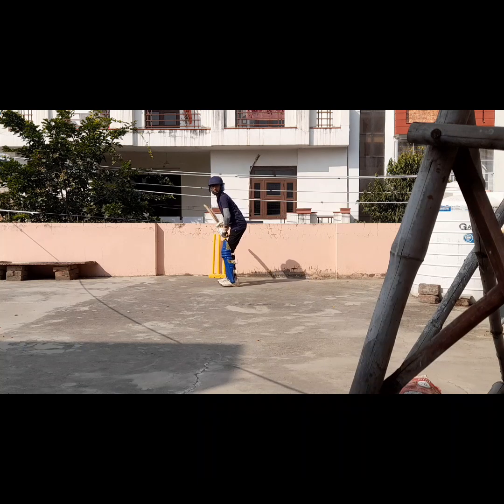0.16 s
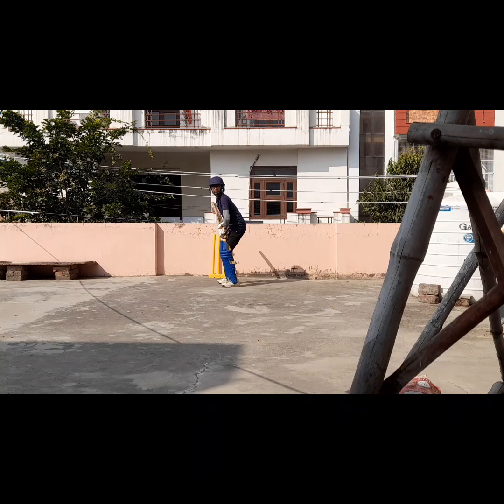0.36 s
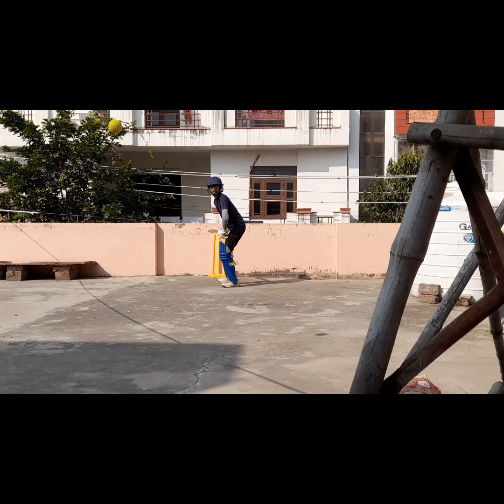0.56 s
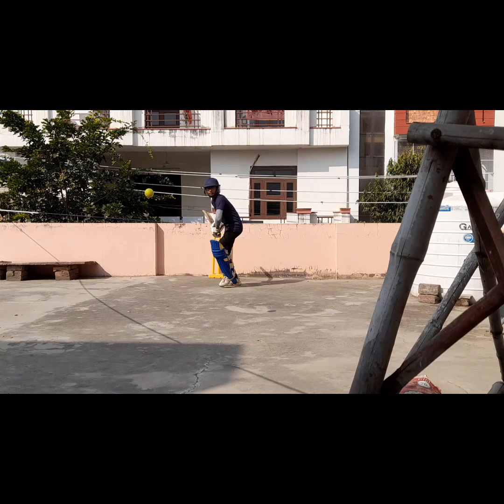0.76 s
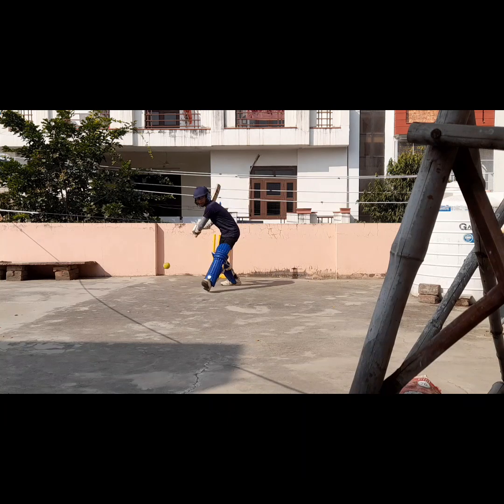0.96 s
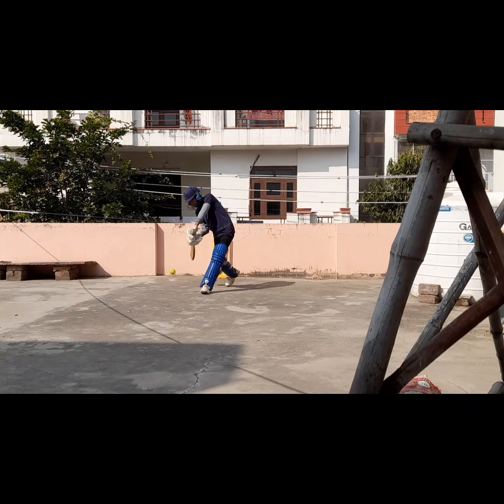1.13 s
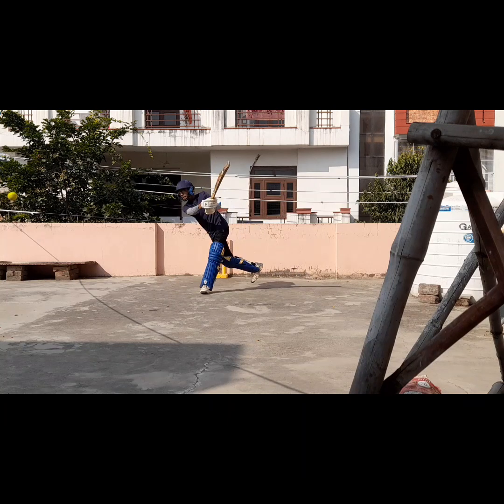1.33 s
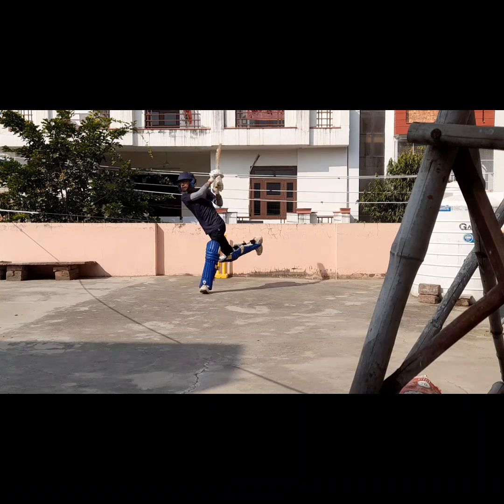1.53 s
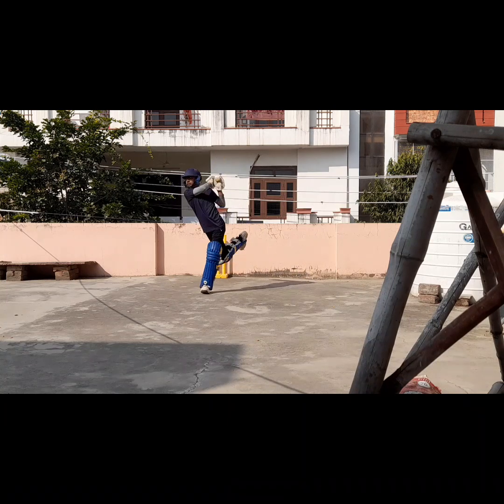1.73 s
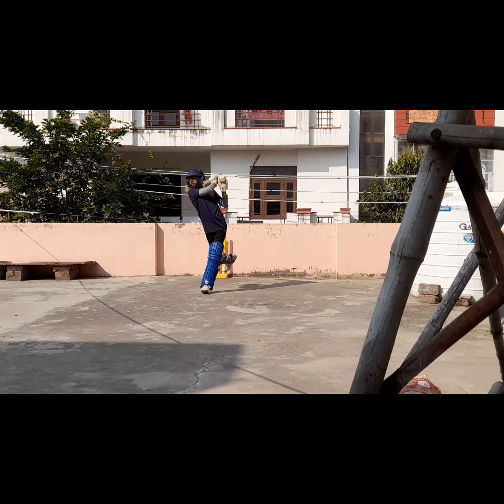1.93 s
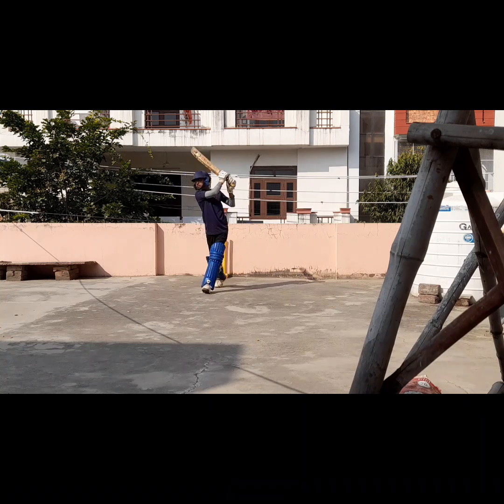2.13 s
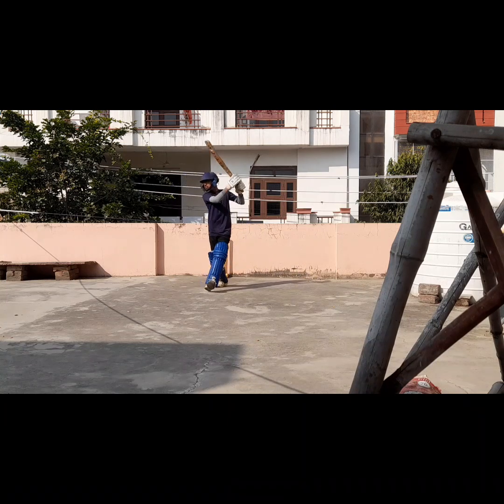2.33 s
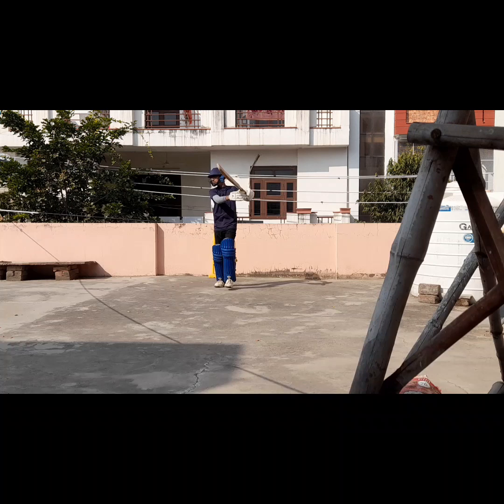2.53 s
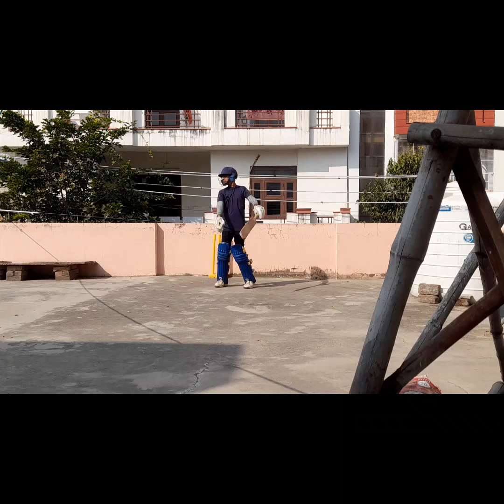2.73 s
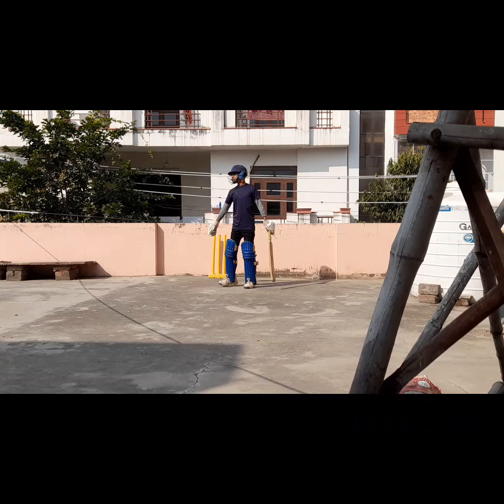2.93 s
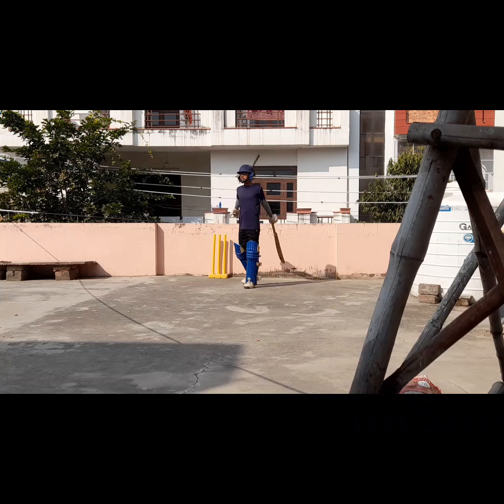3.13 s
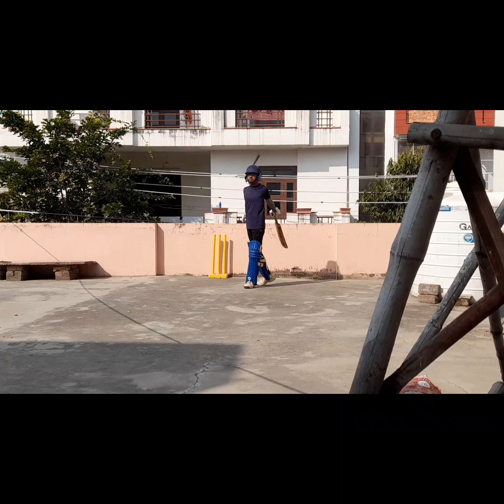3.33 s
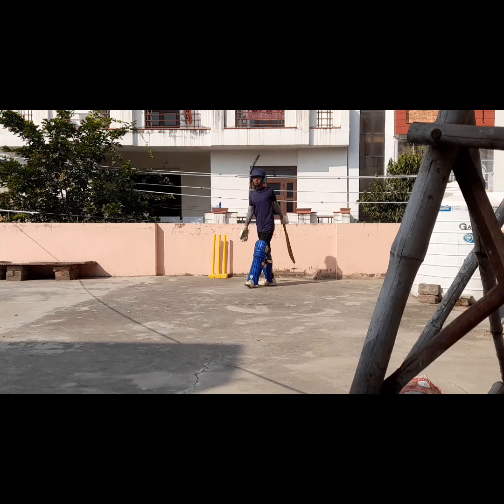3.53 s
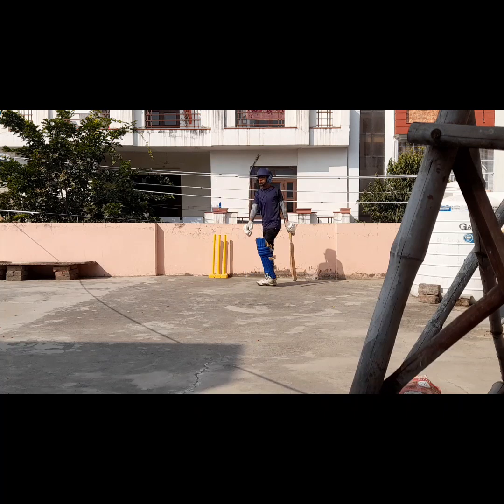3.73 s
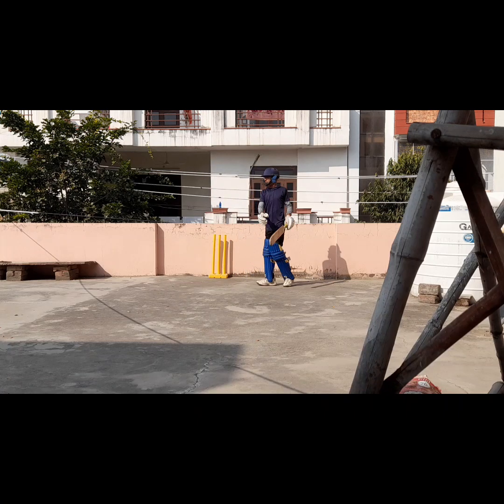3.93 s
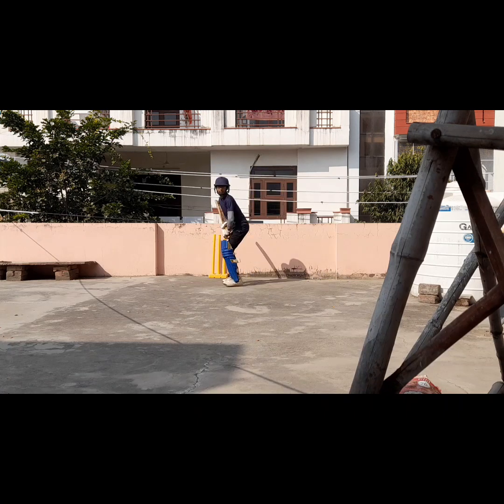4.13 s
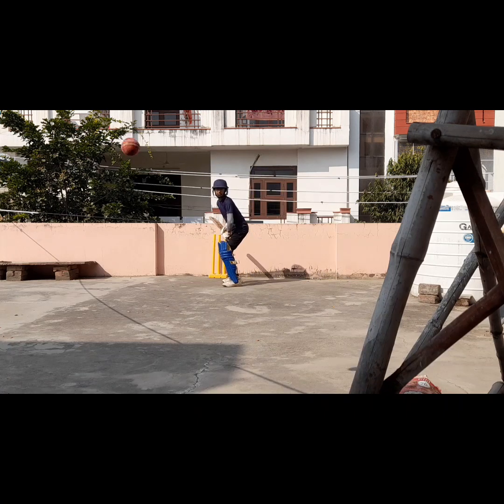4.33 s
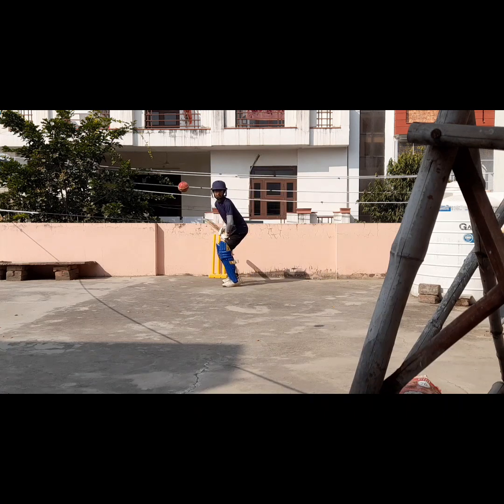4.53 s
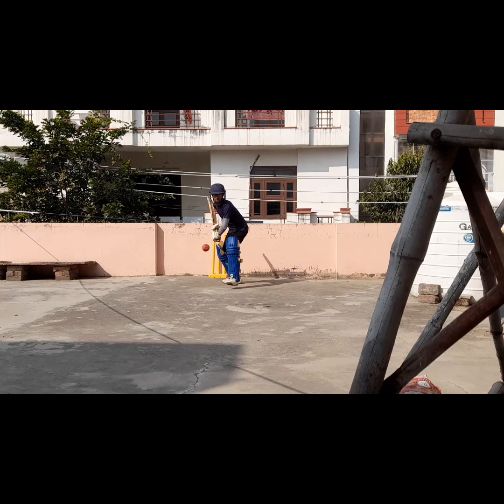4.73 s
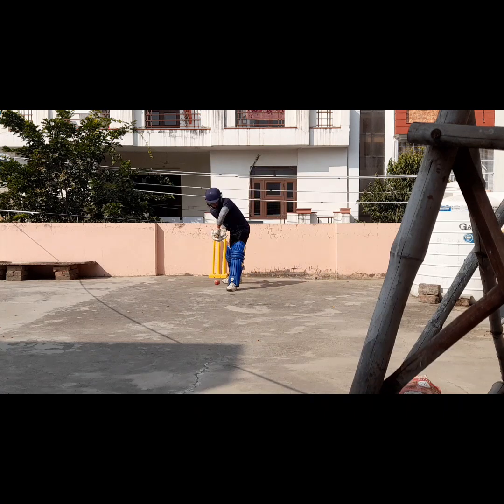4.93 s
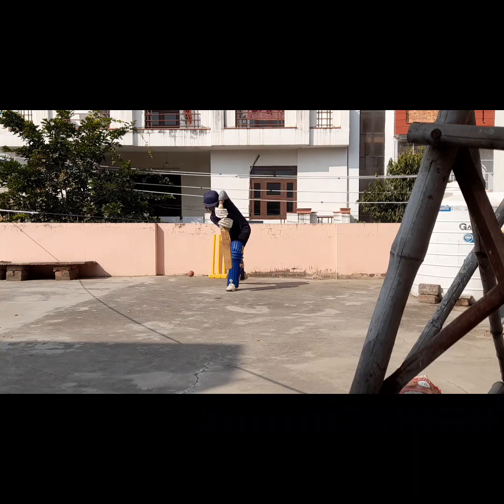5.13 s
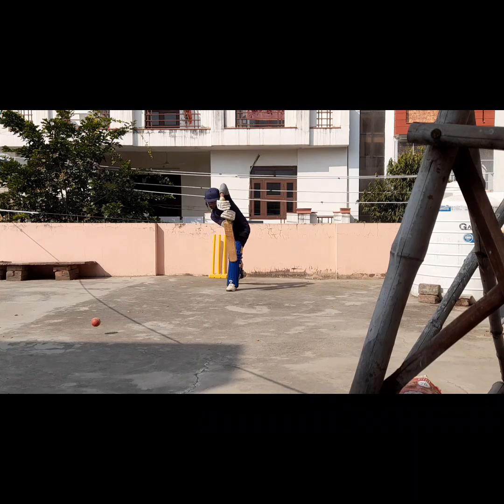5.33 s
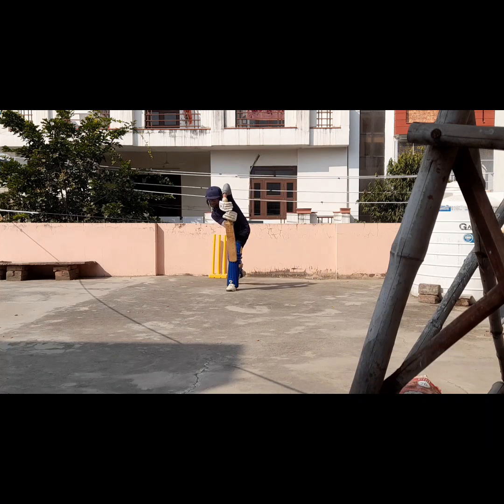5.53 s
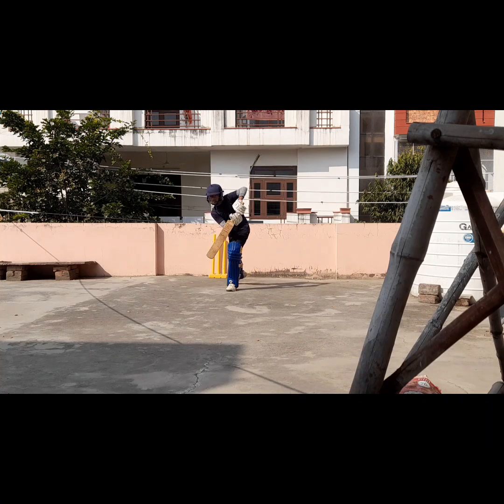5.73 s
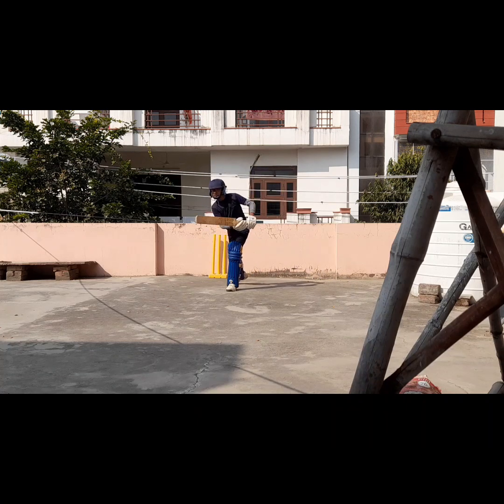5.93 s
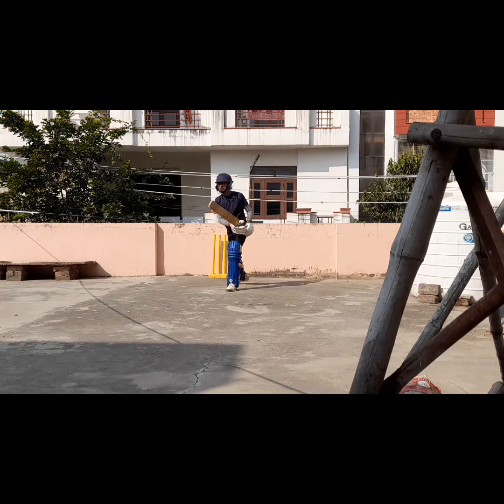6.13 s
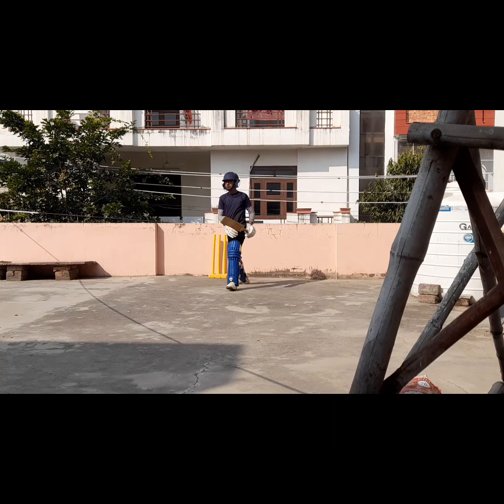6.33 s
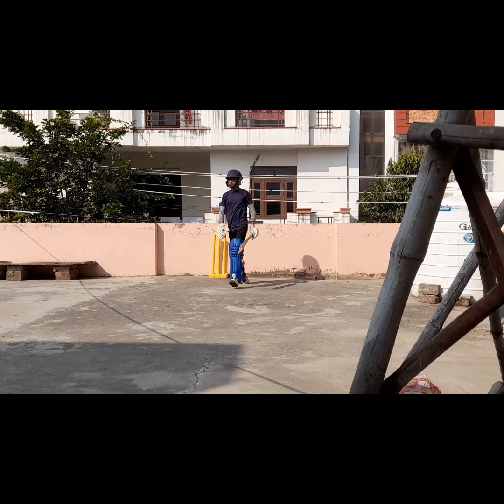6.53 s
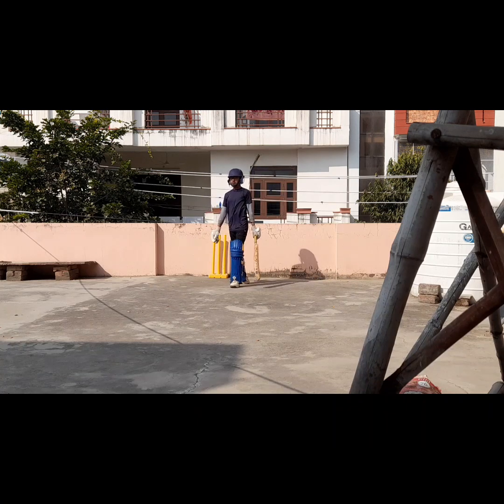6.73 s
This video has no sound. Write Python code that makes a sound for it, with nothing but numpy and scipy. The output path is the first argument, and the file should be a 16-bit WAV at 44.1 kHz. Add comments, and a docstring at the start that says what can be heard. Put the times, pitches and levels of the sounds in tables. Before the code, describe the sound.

Cricket practice on a walled concrete rooftop, each knock echoing briefly off walls and nearby houses. From the start a small engine hums low, its speed wavering, with a brief soft hoot from the street at 0.4 seconds. A small metal piece jingles faintly close by at 0.6 seconds and on and off afterwards. At 1.2 seconds a ball bounces and immediately cracks loudly off a wooden bat; a heavy thump follows at 1.9 and a softer knock at 2.4. Just after 4 seconds the engine cuts off abruptly, leaving quieter distant traffic with a faint tone. A soft thud comes at 4.3 and a barely audible shoe scuff at 4.9. The second ball bounces at 5.0 and meets the bat at 5.15, the loudest hit. Hollow knocks follow at 5.4 and 5.7, and a strong one at 6.1. From 6.4 a faint, shrill whine holds far away.

```python
"""Cricket practice on a walled rooftop. A small engine hunts in speed from the start; a soft hoot at 0.37 s.
From 0.65 s a small metal piece jingles close by. At 1.2 s the first ball pitches, cracks off the bat and
knocks about on the concrete; parapet and house fronts answer each knock. At 4.06 s the sound cuts off
abruptly; after a tiny gap, quieter far traffic begins, with a faint tone. A shoe scuffs at 4.9 s and the
second ball falls in the quiet. At 6.4 s a shrill whine starts up far off."""
import sys
import numpy as np
from scipy import signal
from scipy.fft import rfft, irfft, next_fast_len
from scipy.io import wavfile
from scipy.ndimage import map_coordinates

SR = 44100
rng = np.random.default_rng(int(sys.argv[2]) if len(sys.argv) > 2 else 0)


def dump_mix(stems):
    """Bounce the given channels to the path in sys.argv[1] as a 16-bit WAV at rate SR."""
    frames = np.atleast_2d(stems).T  # one column per channel
    limited = np.clip(frames, -1, 1)  # hard clip at full scale
    pcm = np.round(limited * 32767).astype(np.int16)
    wavfile.write(sys.argv[1], SR, pcm)


N = 298998
TIME = np.arange(N) / SR


def amp(db):
    return 10 ** (np.asarray(db) / 20)


def unit(x):
    return x / np.sqrt(np.mean(x ** 2) + 1e-20)


def along(points, hz):
    """Interpolate (f/Hz, value) points on a log axis."""
    f, v = np.transpose(points)
    return np.interp(np.log(hz + 1), np.log(f + 1), v)


def curve(points):
    """Interpolate (t/s, value) points per sample."""
    return np.interp(TIME, *np.transpose(points))


def wobble(knots_per_s):
    """Smooth random curve."""
    return map_coordinates(rng.standard_normal(int(N * knots_per_s / SR) + 4), [TIME * knots_per_s])


def filtered(x, response):
    """Apply a frequency response."""
    n = x.shape[-1]
    m = next_fast_len(n + SR // 4)
    return irfft(rfft(x, m) * response(np.fft.rfftfreq(m, 1 / SR)), m)[..., :n]


def bell(offset, width):
    """Resonance peak of height 1."""
    return 1 / (1 + (offset / width) ** 2)


def dulled(x, corner_hz):
    """One-pole low-pass, as off rough plaster."""
    pole = np.exp(-2 * np.pi * corner_hz / SR)
    return signal.lfilter([1 - pole], [1, -pole], x)


def pulse(gain):
    """Minimum-phase pulse with this spectrum."""
    cepstrum = irfft(np.log(np.maximum(gain, 1e-6)))
    half = len(cepstrum) // 2
    cepstrum[1:half] *= 2
    cepstrum[half + 1:] = 0
    return irfft(np.exp(rfft(cepstrum)))


def add(track, at_s, sound):
    part = track[:, max(round(at_s * SR), 0):][:, :sound.shape[-1]]
    part += sound[..., :part.shape[-1]]


def line_noise(lines):
    """Stereo noise in narrow lines, rms 1."""
    shape = lambda f: sum(amp(db) / np.sqrt(width) * bell(f - hz, width) for hz, width, db in lines)
    return unit(filtered(rng.standard_normal((2, N)), shape))


# diffuse field: f/Hz, left-right coherence
COHERENCE = [(60, 0.77), (200, 0.94), (380, 0.67), (700, 0.097), (1400, 0.02), (15000, 0.025)]

def spread(pair, spectrum):
    """Colour two noises: bass alike on both sides, treble unrelated."""
    turn = lambda hz: np.arccos(np.clip(along(COHERENCE, hz), -1, 1)) / 2
    mid, side = filtered(pair, lambda hz: amp(along(spectrum, hz)) * [np.cos(turn(hz)), np.sin(turn(hz))])
    return np.array([mid + side, mid - side])


def air(spectrum):
    """Steady diffuse noise, rms 1."""
    return unit(spread(rng.standard_normal((2, N)), spectrum))


# far tone: f/Hz, width/Hz, level/dB
TONE_LINES = [(958, 33.9, -4), (1980, 30, -9.5)]

def far_tone(level_db=-70.5, fade_from_s=4.9, fade_db_per_s=14.5):
    """A faint tone holds, then fades."""
    return amp(level_db - fade_db_per_s * np.maximum(TIME - fade_from_s, 0)) * line_noise(TONE_LINES)


# recorder's hiss dip: t/s, gain/dB
HISS_GAIN = [(4.1, 4), (4.9, 3.5), (5.6, -8), (6.2, -5), (6.7, 4)]

def hiss_dip(background, corner_hz=2400):
    """The background hiss dulls after the loud hit, then recovers."""
    hiss = filtered(background, lambda hz: 1 - 1 / (1 + (hz / corner_hz) ** 4))
    return background + (amp(curve(HISS_GAIN)) - 1) * hiss


# far traffic and hiss: f/Hz, density/dB
BACKGROUND_SPECTRUM = [(15, -62), (25, -16.5), (74, -11.5), (92, -3), (166, -17), (200, -7), (270, -16.5),
                       (659, -21), (1440, -30.5), (2000, -37), (2160, -38.5), (6560, -44.5), (8590, -50.5),
                       (12900, -44), (16000, -59)]

def traffic(start_s=4.098, level_db=-56, bass_hz=140, bass_db_per_s=2):
    """Far town rumble with the tone in it; the bass grows."""
    rumble = hiss_dip(amp(level_db + wobble(4.9)) * air(BACKGROUND_SPECTRUM))
    bass = filtered(rumble, lambda hz: 1 / (1 + (hz / bass_hz) ** 4))
    rumble += (amp(bass_db_per_s * (TIME - start_s)) - 1) * bass
    gate = np.clip((TIME - start_s) / 0.0016, 0, 1)
    return gate * (rumble + far_tone()) * amp([[-0.8], [0.8]])


# whine: f/Hz, width/Hz, level/dB
WHINE_BANDS = [(2430, 53, -22.5), (2865, 31, -12), (3284, 43, 1.5), (3675, 50, -8.5), (6900, 300, -23)]

def whine(start_s=6.355, rise_s=0.13, level_db=-50.5):
    """A shrill far buzz swells and holds: one line with sidebands, blurred by echoes."""
    swell = np.clip((TIME - start_s) / rise_s, 0, 1) ** 1.3
    return swell * amp(level_db) * line_noise(WHINE_BANDS) * amp([[-1], [1]])


def hoot(peak_s=0.366, half_length_s=0.05, pitch_hz=481, level_db=-39.5):
    """One brief soft hoot from the street."""
    swell = np.exp(-((TIME - peak_s) / half_length_s) ** 2)
    return amp(level_db) * swell * np.sin(2 * np.pi * pitch_hz * TIME + 0.83 * wobble(31.7))


# exhaust pipe response: f/Hz, gain/dB
PIPE_RESPONSE = [(24, -56), (42, -10.5), (55, -7), (68, -12), (88, -10.5), (106, 6), (135, -8), (167, 1),
                 (192, 0), (220, 0), (255, -16.5), (390, -27.5)]
# low, middle and high exhaust bands: t/s, level/dB
THRUM_LEVEL = [(0, -48), (0.2, -45.5), (0.78, -45), (1.13, -62), (1.45, -52), (1.95, -44.5), (2.3, -55),
               (2.95, -54), (3.12, -51), (3.5, -53), (4.0, -58)]
BOOM_LEVEL = [(0, -45.5), (0.8, -48), (1.3, -39.5), (1.55, -44.5), (1.68, -53), (1.95, -45), (2.08, -40),
              (2.2, -40), (2.4, -47), (2.65, -45), (2.87, -36), (2.98, -53.5), (3.08, -39), (3.29, -33),
              (3.42, -47), (3.58, -42), (3.69, -39), (3.95, -46)]
DRONE_LEVEL = [(0, -40.5), (0.22, -35.5), (0.47, -32), (0.88, -40.5), (1.02, -36.5), (1.16, -35.5),
               (1.5, -39.5), (1.8, -37.5), (2.02, -47), (2.11, -35), (2.3, -41.5), (2.42, -35.5),
               (2.67, -51), (2.88, -38), (3.05, -42), (3.37, -37.5), (3.92, -43), (4.03, -38.5)]

def exhaust(firing_hz, waver_db=3.5, stray_rad=0.32, thrum_top_hz=75, boom_top_hz=140):
    """Street echoes blur the firings into thrum, boom and drone, each with its own swell."""
    firings = np.cumsum(firing_hz) / SR
    orders = np.arange(1, 18)
    waves = np.array([np.sin(2 * np.pi * (k * firings + rng.random())
                             + stray_rad * np.sqrt(k) * wobble(16)) for k in orders])
    hz = orders[:, None] * firing_hz
    pipe = amp(along(PIPE_RESPONSE, hz))
    thrum = unit(np.sum(pipe * waves / (1 + (hz / thrum_top_hz) ** 12), axis=0))
    sound = amp(curve(THRUM_LEVEL) + 1.8 * wobble(11)) * thrum
    waver = amp(waver_db * np.array([wobble(8) for _ in orders]))
    upper = pipe * waver / (1 + (thrum_top_hz / hz) ** 12)
    boom_share = 1 / (1 + (hz / boom_top_hz) ** 12)
    for level, gains in (BOOM_LEVEL, upper * boom_share), (DRONE_LEVEL, upper * (1 - boom_share)):
        rms = np.sqrt(np.sum(gains ** 2, axis=0) / 2)
        sound += amp(curve(level)) * np.sum(gains * waves, axis=0) / rms
    # side echo off a wall across the street, 17 ms
    echo = amp(-15) * filtered(sound, lambda f: np.exp(-2j * np.pi * f * 0.017))
    return np.array([sound - echo, sound + echo])


# gear lines: multiple of firing rate, level/dB, width/Hz, rise with firing rate/(dB/Hz)
GEAR_LINES = [(73.7, -5.5, 75, 2), (72.06, 1.5, 150, -0.5), (107, -8, 130, 0.8), (113, -3, 240, -1.2),
              (144.8, -7.5, 260, 1.5)]

def gear_whine(firing_hz, over_cruise_hz):
    """Meshing gears: noisy lines in step with the firings; one channel."""
    firings = np.cumsum(firing_hz) / SR
    out = np.zeros(N)
    for order, db, width_hz, db_per_hz in GEAR_LINES:
        flutter = wobble(2 * width_hz) + 1j * wobble(2 * width_hz)
        mesh = np.real(flutter * np.exp(2j * np.pi * order * firings))
        out += amp(db + db_per_hz * over_cruise_hz) * mesh
    return out


# engine speed: t/s, firing rate/Hz
FIRING_RATE = [(0.0, 23.6), (0.18, 26.5), (0.36, 27.3), (0.55, 27.7), (0.85, 26.9), (1.08, 24.1),
               (1.36, 20.8), (1.75, 21.5), (2.1, 22.8), (2.41, 24.6), (2.66, 22.8), (2.86, 23.2),
               (3.17, 20.5), (3.34, 20.7), (3.7, 21.5), (4.05, 22.4)]
# engine effort: t/s, level/dB
EFFORT_LEVEL = [(0, -52.5), (0.4, -49.5), (0.85, -50.5), (1.1, -50.5), (1.75, -51.5), (2.1, -49.5),
                (2.5, -51.5), (2.7, -55), (2.9, -49), (3.25, -49), (4.05, -51.5)]
# rumble and rushing air: f/Hz, density/dB
RUMBLE_SPECTRUM = [(24, -43), (45, -22.5), (100, -8), (200, -9), (270, -10), (390, -18.5), (480, -10),
                   (800, -32.5), (1500, -84.5)]
RUSH_SPECTRUM = [(200, -18.5), (500, -9), (700, -2), (1100, -7), (1700, -7.5), (2200, -11), (3600, -14.5),
                 (4400, -10), (5600, -21), (7200, -21), (8300, -32), (9900, -21), (13000, -32),
                 (16000, -43)]

def engine(heard_until_s=4.06, cruise_hz=22.6, gears_db=-9, rumble_db=4):
    """Exhaust, plus rumble, rushing air and gears that grow louder under load."""
    speed_hz, effort_db = curve(FIRING_RATE), curve(EFFORT_LEVEL)
    load_db = effort_db - effort_db.mean()
    firing_hz = speed_hz * (1 + 0.009 * wobble(14))
    gears = np.array([gear_whine(firing_hz, speed_hz - cruise_hz) for _ in range(2)])
    gears *= amp(gears_db + 0.99 * load_db + 1.8 * wobble(8.3))
    rumble = amp(effort_db.mean() + 0.76 * load_db + rumble_db + 2 * wobble(12)) * air(RUMBLE_SPECTRUM)
    gate = np.clip((heard_until_s - TIME) / 0.0015, 0, 1)
    return gate * (exhaust(firing_hz) + rumble + amp(effort_db) * (air(RUSH_SPECTRUM) + gears))


def scuff(peak_s=4.935, half_length_s=0.014, level_db=-66):
    """A shoe slides on the concrete as the batter steps in."""
    stroke = np.exp(-((TIME - peak_s) / half_length_s) ** 2)
    return amp(level_db) * stroke * air([(500, -27), (2500, 5), (6000, 3), (9000, -19), (16000, -27)])


# swings of the metal piece: t/s, relative level/dB, ring gain/dB, share of free ring time
METAL_SWINGS = [(0.648, -25.5, 4, 0.53), (1.162, -34, -9, .3), (1.2058, -31, 0, 0.56),
                (1.7686, -38, 1.5, .6), (1.7967, -33, 7.5, 0.27), (1.8103, -28.5, -2, .3),
                (2.13, -29, 5, 0.7), (2.2172, -36.5, 3, 1), (2.3342, -39.5, 4, 0.89), (2.369, -40.5, 4, 1),
                (3.2228, -41, 4, .5), (4.614, -29, 0, 0.45), (4.634, -27, -11, .2), (5.192, -30, 1, .5),
                (5.221, -21, 1.5, 0.42), (5.245, -33, 0.5, 0.98), (5.8704, -36, 0, 0.42),
                (5.903, -34.5, 1, .3), (5.915, -37, -1, 0.41), (5.928, -34, -3.5, 0.55),
                (6.398, -26, 1, 0.29)]
# its modes: f/Hz, level/dB, nominal t60/s
METAL_MODES = [(11140, 1, 0.03), (12400, -9, 0.24), (13000, 0, .022), (14800, -12, 0.11)]
# its contact tick: f/Hz, level/dB
TICK_SPECTRUM = [(1000, -52.5), (3500, -21), (7000, -21), (10500, 6), (14000, 1.5), (16000, -8)]

def jingle(gain_db=-11, tick_db=2, tick_s=0.0031, rebound_db=-6):
    """A small metal piece touches, rings and rebounds twice; each touch damps it differently."""
    out, t = np.zeros((2, N)), np.arange(SR // 4) / SR
    hz, mode_db, t60_s = np.transpose(METAL_MODES)[:, :, None]
    for at_s, db, ring_db, share in METAL_SWINGS:
        for touch in range(3):
            strength = amp(mode_db + rng.normal(0, 1.9, (2, len(hz), 1)))
            phase = rng.uniform(0, 2 * np.pi, strength.shape)
            life_s = t60_s * share * rng.uniform(0.88, 2.1, t60_s.shape)
            ring = np.sum(strength * amp(-60 * t / life_s) * np.sin(2 * np.pi * hz * t + phase), axis=1)
            noise = filtered(rng.standard_normal((2, len(t))), lambda f: amp(along(TICK_SPECTRUM, f)))
            tick = unit(noise) * np.exp(-t / tick_s)
            clink = amp(db + gain_db + touch * rebound_db) * (amp(ring_db) * ring + amp(tick_db) * tick)
            add(out, at_s + touch * rng.uniform(0.005, 0.0068), clink)
    return out * amp([[3], [-3]])


def scatter(t60_s, rise_s):
    """Diffuse stereo reflections, energy 1; t60_s is a number or a function of frequency."""
    hz, t, frames = signal.stft(rng.standard_normal((2, SR)), SR, nperseg=128)
    life_s = t60_s(hz)[:, None] if callable(t60_s) else t60_s
    tail = signal.istft(frames * amp(-60 * t / life_s), SR, nperseg=128)[1][:, :SR]
    tail *= 1 - np.exp(-TIME[:SR] / rise_s)
    return tail / np.linalg.norm(tail[0])


def clutter(db):
    """Short, dense reflections."""
    return amp(db) * spread(scatter(0.048, rise_s=0.0014), [(100, -4), (600, 4.5), (2000, 3), (15000, 1.5)])


# yard decay: f/Hz, t60/s
YARD_T60 = [(100, 0.59), (400, 0.63), (1000, 0.68), (2800, 0.69), (7000, 0.58), (15000, 0.3)]
# yard colour: f/Hz, gain/dB
YARD_COLOUR = [(60, 2.5), (200, 3), (450, -3), (900, -3), (1400, -3.5), (2200, -2), (4000, -1), (8000, 3),
               (15000, 7)]
# house fronts across the street: delay/s, level/dB
HOUSE_ECHOES = [(.145, -13.5), (.228, -20.5)]

def rooftop(near_s, far_s, far_db, yard_db, wall_hz=4500, parapet_hz=8000, far_hz=2600):
    """Impulse responses: early (direct, side wall, parapet) and late (yard, far wall, houses)."""
    direct = np.zeros((2, SR))
    direct[:, 0] = 1
    early = direct + clutter(-5.5)
    add(early, 0.0038, amp(-10) * dulled(direct, wall_hz))
    add(early, near_s, amp(-4) * (dulled(direct, parapet_hz) + clutter(-4.5)))
    late = amp(yard_db - 1) * spread(scatter(lambda hz: along(YARD_T60, hz), rise_s=0.0024), YARD_COLOUR)
    # the parapet's slap rings through the yard too: hollow tail
    add(late, near_s, amp(-4) * dulled(late, wall_hz))
    late /= np.hypot(1, amp(-4))
    # ledges and recesses blur the far wall's echo, which crosses the yard twice
    echo = amp(far_db) * dulled(early + clutter(-4), far_hz) / np.hypot(1, amp(-4))
    add(late, far_s, echo)
    add(late, 2 * far_s, amp(-12.5) * dulled(echo, wall_hz))
    for delay_s, db in HOUSE_ECHOES:
        add(late, delay_s, amp(db + yard_db) * dulled(scatter(0.14, rise_s=0.013), far_hz))
    return early, late


def swing_up(push, hz, damping=1.3):
    """All-pass: the struck body takes a cycle to swing up, so its pitch lags the crack."""
    pole = lambda f: hz * hz - f * f + 1j * damping * hz * f
    return filtered(push, lambda f: np.conj(pole(f)) / pole(f))


# ball contacts, plus a wall slap 30 ms after the last knock:
# t/s, level/dB, body low/Hz, body top/Hz, thump/Hz, thump/dB, crack/dB, slope/(dB/oct), crack peak/Hz,
# parapet delay/s, far wall delay/s, far wall/dB, yard/dB, ring/Hz, ring/dB (gains relative)
KNOCKS_AND_SLAP = [(1.162, -3, 203, 519.6, 298, -10, -1, -3, 1800, 0.0093, 0.065, -16, 4.5, 600, -30),
                   (1.2833, 19, 130, 380, 231, -5, -7, -1.5, 12700, 0.0099, 0.06, -8.5, -0.5, 260, -11),
                   (1.8850, 17, 80, 497, 196, 15, -16.5, -2.5, 5600, 0.005, 0.045, -5.5, -1, 210, -22),
                   (2.4360, -6, 171, 617, 201.3, 11, -1.5, -4.5, 1800, 0.0052, 0.062, -22, 5.5, 210, -2),
                   (3.896, -20, 300.6, 590.7, 400, -9, 2.5, 0, 5000, 0.0055, 0.044, -14, -15, 670, -29),
                   (4.277, -6.5, 150, 450, 218, 2, -20.5, -9.5, 1200, 0.015, 0.061, -11, -6.5, 220, -26),
                   (4.337, -30, 297, 604, 400, -11.5, -2.5, 1, 14000, 0.0068, .045, -19, -9.5, 690, -31.5),
                   (4.9990, 8, 150, 1090, 221, 8, -3.5, -5.5, 3000, 0.0099, 0.058, -25, 3, 240, -3),
                   (5.1452, 27.5, 335, 1025, 594, 0.5, -21, -2.5, 3800, 0.0102, .062, -10, -0.5, 1300, -11.5),
                   (5.3940, 7.5, 160, 887, 286, 3.5, -10, -4.5, 10060, 0.011, 0.067, -17, -2.5, 930, -13),
                   (5.7463, 4, 79.8, 850, 291, 15.5, -17.5, -4, 4500, 0.0081, 0.045, -14, -4.5, 130, 1.5),
                   (6.0530, 17, 171, 620, 500, 2, -16, -4, 2100, 0.0072, 0.046, -10, -5, 772, -6),
                   (6.0826, 6.5, 150, 604, 484, 8, -20.5, -2.5, 6000, 0.0045, 0.044, -7, -12.5, 500, -17)]
# crack before its slope: f/Hz, level/dB
CRACK_SPECTRUM = [(100, -24), (400, -0.5), (900, 0), (1400, -1.5), (2100, -2), (3300, -2.5), (4600, -1),
                  (6500, -3), (8300, -4.5), (10500, -2), (13500, -8), (16000, -12)]
# hollow resonances: f/Hz, width/Hz, lift/dB
KNOCK_MODES = [(323, 27, 2.5), (654, 22, 1.5), (880, 31, 4), (1351, 210, 5.5), (2400, 270, 3.5),
               (4200, 180, 3.5)]
# left over right: f/Hz, level/dB
KNOCK_BALANCE = [(1000, -1), (4000, -4), (8000, -1), (12000, 2.5)]

def ball_knocks(grit_s=0.00074, grit_hz=1800, grit_db=1, snap_db=-3, echo_crack_db=2.5, left_lead_s=7e-5):
    """Each knock is a push and a thump: the softer, the lower; hard surfaces add a gritty crack."""
    out, t = np.zeros((2, N)), np.arange(SR // 100) / SR
    hz = np.fft.rfftfreq(4096, 1 / SR) + 1
    hollow = amp(-3 + sum(lift_db * bell(hz - mode_hz, width) for mode_hz, width, lift_db in KNOCK_MODES))
    for (at_s, db, low_hz, top_hz, thump_hz, thump_db, crack_db, slope_db, peak_hz,
         near_s, far_s, far_db, yard_db, ring_hz, ring_db) in KNOCKS_AND_SLAP:
        passband = 1 / np.sqrt((1 + (low_hz / hz) ** 2.5) * (1 + (hz / top_hz) ** 9.4))
        thump = amp(thump_db) * bell(hz / thump_hz - 1, 0.26) / (1 + (thump_hz / 2 / hz) ** 2)
        body = np.hypot(passband, thump)
        crack = amp(crack_db + along(CRACK_SPECTRUM, hz) + slope_db * np.log2(np.maximum(hz / 1000, 1)))
        crack *= amp(6 * bell(hz / peak_hz - 1, 0.2))
        # the crack's treble frays over about 1 ms
        burst = rng.standard_normal((2, len(t))) * np.exp(-t / grit_s)
        burst /= np.linalg.norm(burst, axis=1, keepdims=True)
        grit = signal.fftconvolve(pulse(hollow * crack / (1 + (grit_hz / hz) ** 2))[None], burst, axes=1)
        push = swing_up(pulse(hollow * np.hypot(body, amp(snap_db) * crack)), thump_hz)
        push = push + amp(grit_db) * grit[:, :len(push)]
        early, late = rooftop(near_s, far_s, far_db, yard_db)
        add(out, at_s, amp(db) * signal.fftconvolve(push, early, axes=1))
        # echoes gather all directions: even colour, duller after a dull crack
        late = dulled(late, 15000 * 2 ** (0.62 * slope_db))
        radiated = swing_up(pulse(hollow * np.hypot(body, amp(echo_crack_db) * crack)), thump_hz)
        add(out, at_s, amp(db) * signal.fftconvolve(radiated[None], late, axes=1))
        # one band rings on between the walls
        ring = filtered(scatter(0.83, rise_s=0.037), lambda f: bell(f / ring_hz - 1, 0.17))
        add(out, at_s, amp(db + ring_db + 3) * ring)
    side = np.array([[1], [-1]])
    lead = lambda f: np.exp(1j * np.pi * f * left_lead_s * side)
    return filtered(out, lambda f: lead(f) * amp(along(KNOCK_BALANCE, f) * side / 2))


def scene():
    """Ball, shoe, metal and the town around them."""
    return ball_knocks() + scuff() + jingle() + engine() + hoot() + traffic() + whine()


def record(dry):
    """Hard limit at full scale, then a steep low-pass at 15.8 kHz."""
    return filtered(np.clip(dry, -1, 1), lambda hz: 1 / np.sqrt(1 + (hz / 15800) ** 120))


dry = scene()
out = record(dry)
dump_mix(out)
```